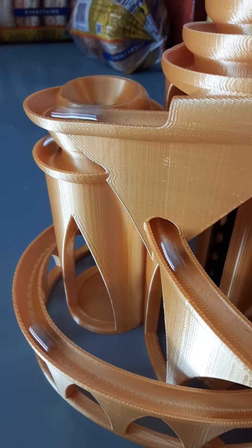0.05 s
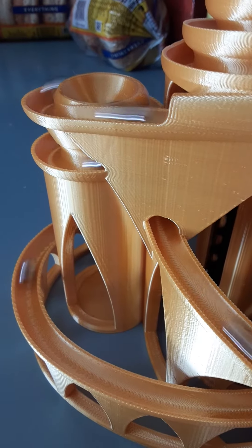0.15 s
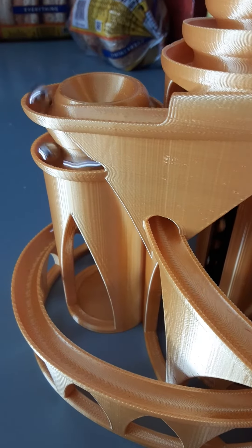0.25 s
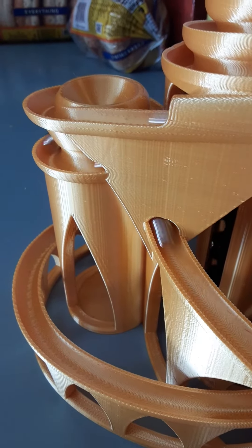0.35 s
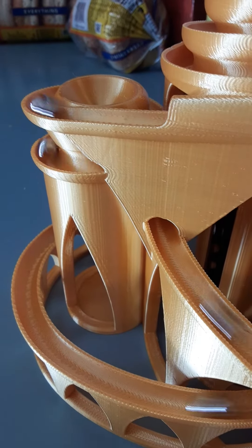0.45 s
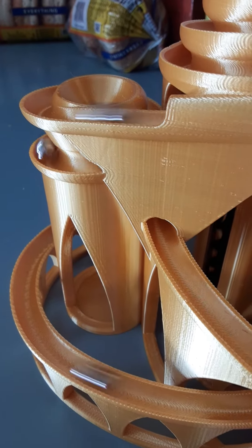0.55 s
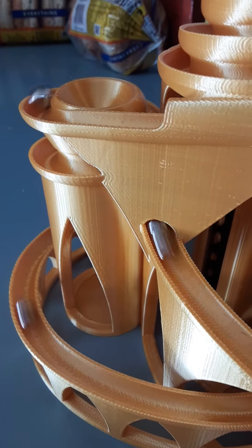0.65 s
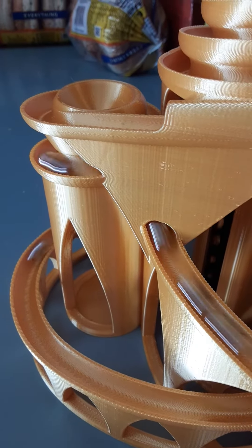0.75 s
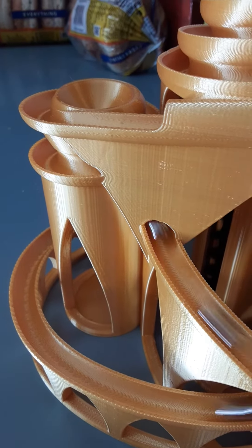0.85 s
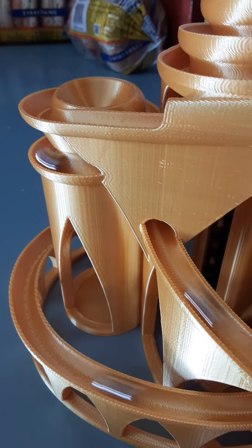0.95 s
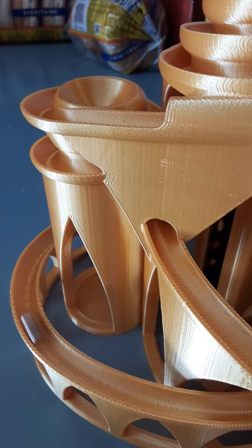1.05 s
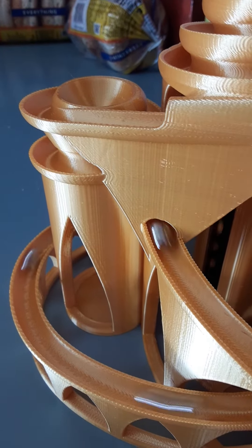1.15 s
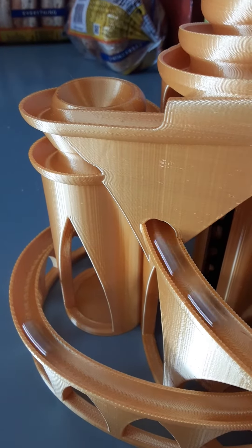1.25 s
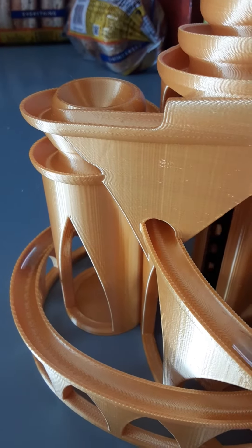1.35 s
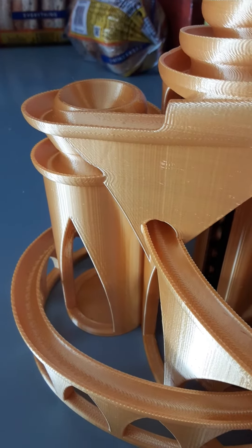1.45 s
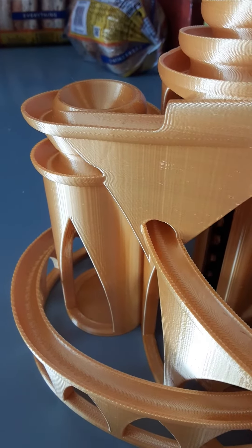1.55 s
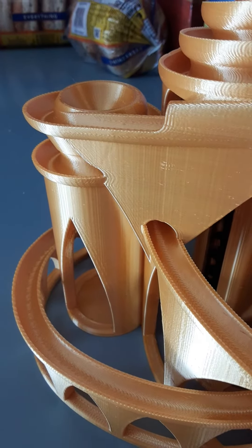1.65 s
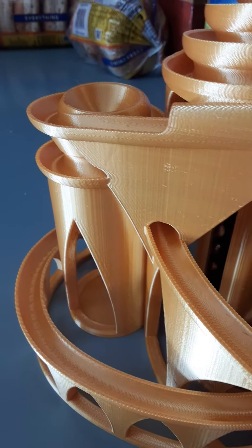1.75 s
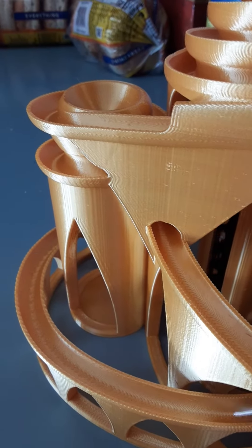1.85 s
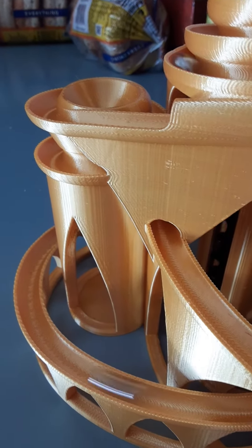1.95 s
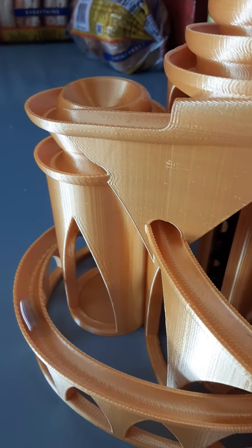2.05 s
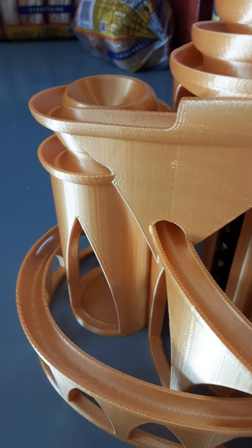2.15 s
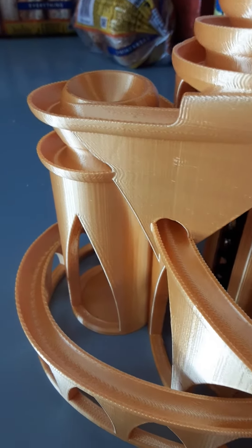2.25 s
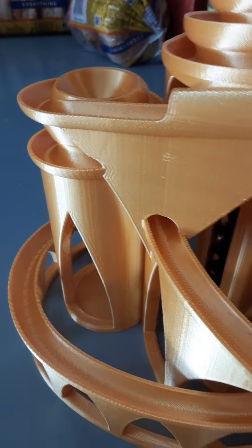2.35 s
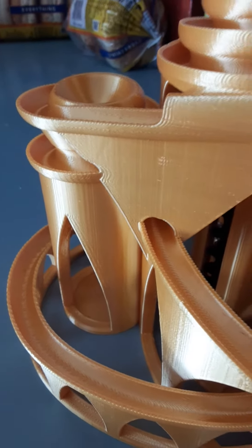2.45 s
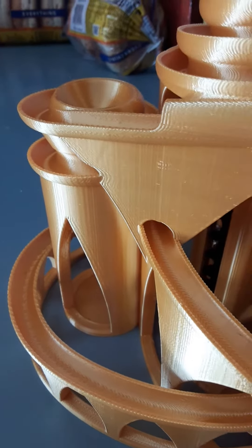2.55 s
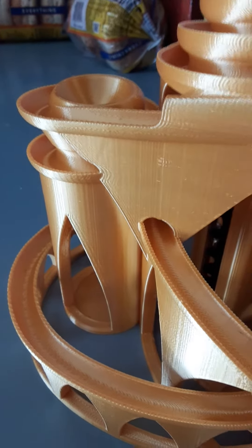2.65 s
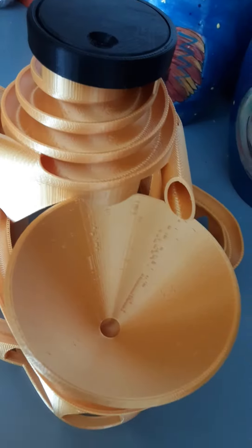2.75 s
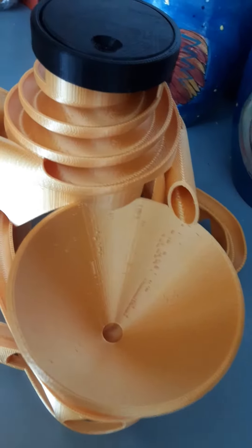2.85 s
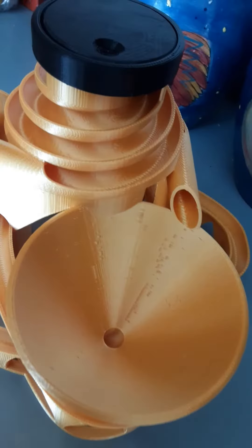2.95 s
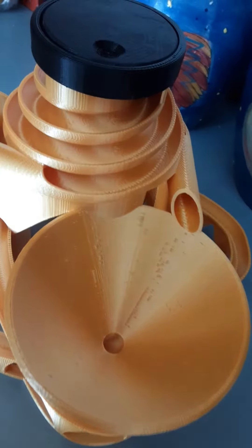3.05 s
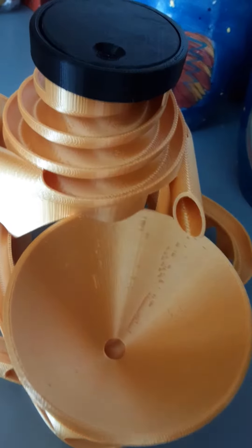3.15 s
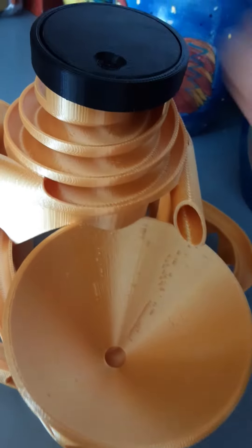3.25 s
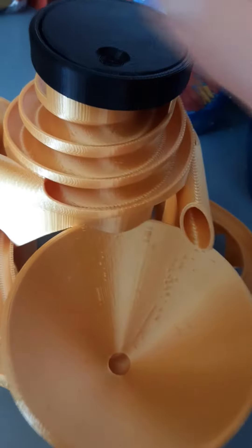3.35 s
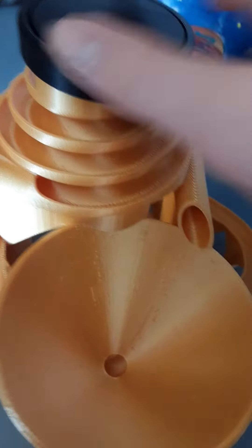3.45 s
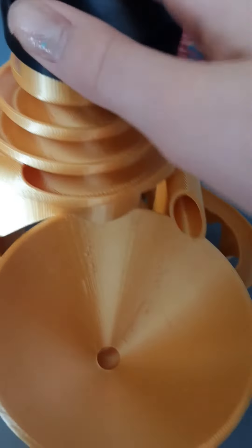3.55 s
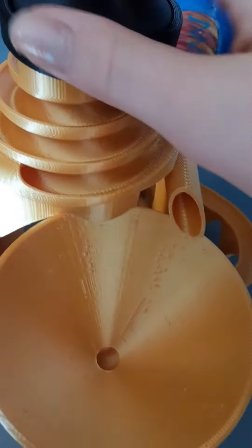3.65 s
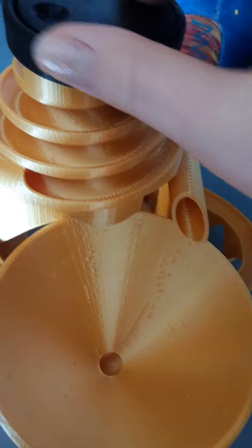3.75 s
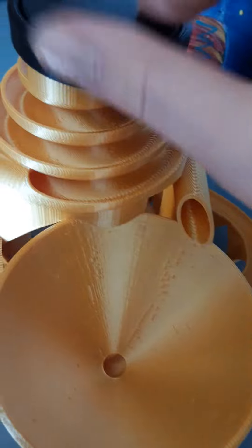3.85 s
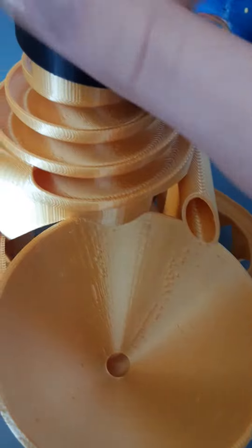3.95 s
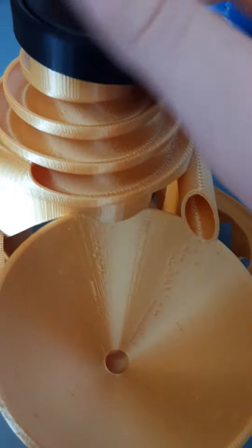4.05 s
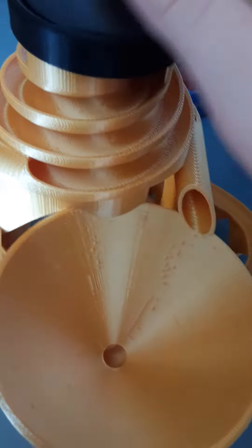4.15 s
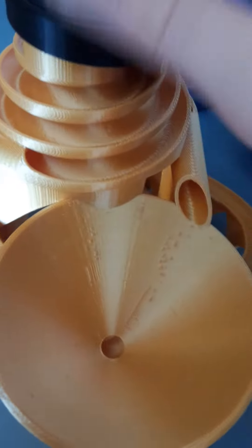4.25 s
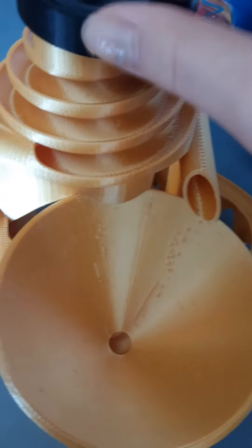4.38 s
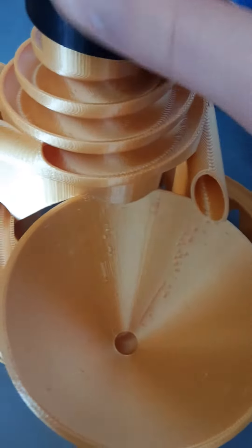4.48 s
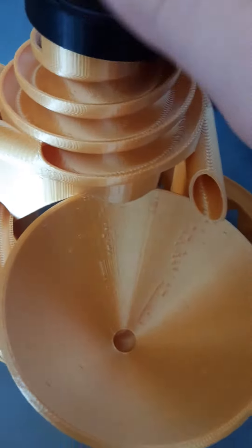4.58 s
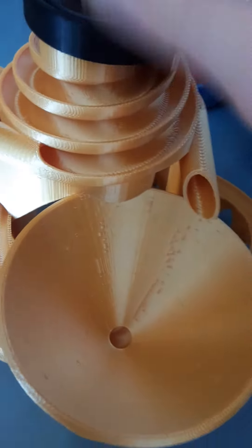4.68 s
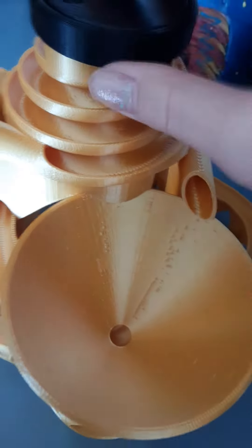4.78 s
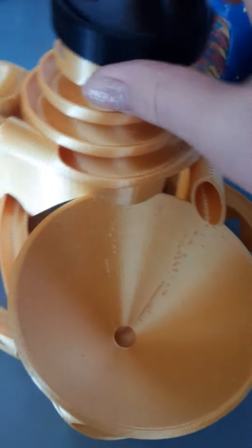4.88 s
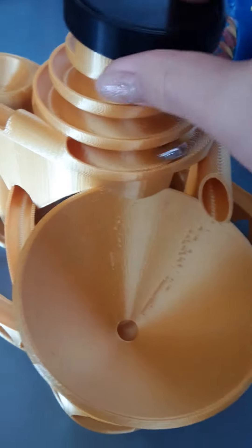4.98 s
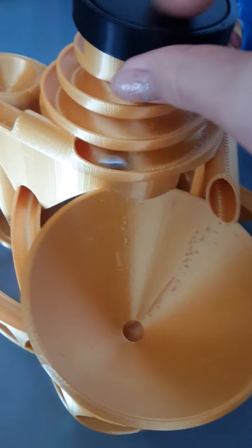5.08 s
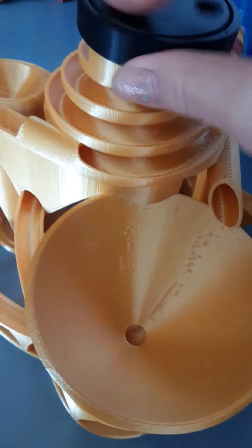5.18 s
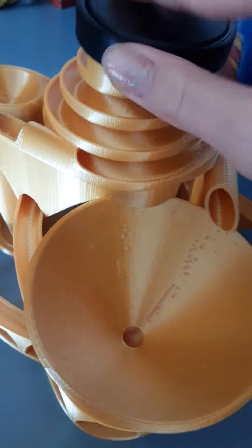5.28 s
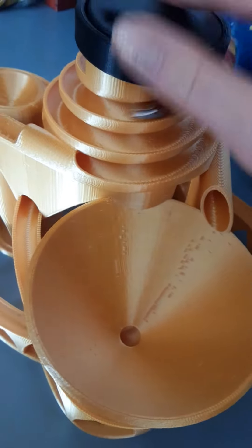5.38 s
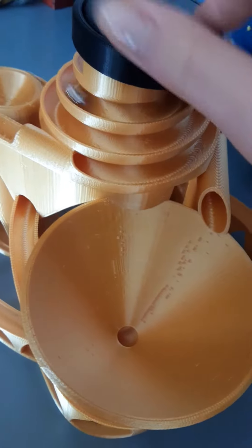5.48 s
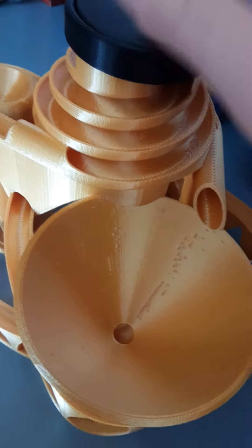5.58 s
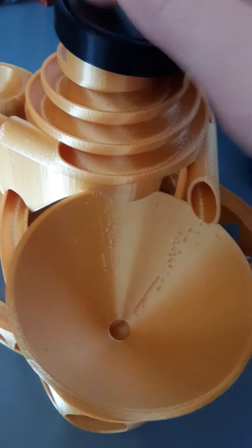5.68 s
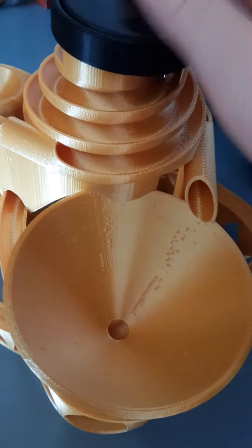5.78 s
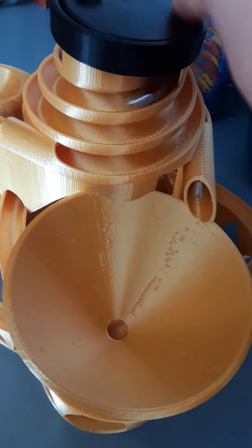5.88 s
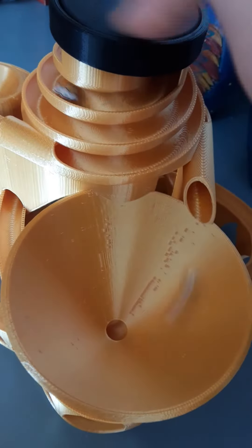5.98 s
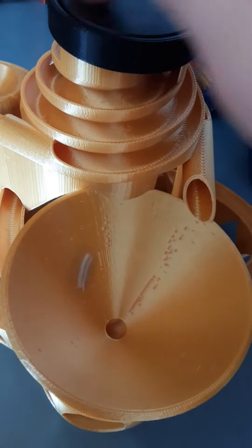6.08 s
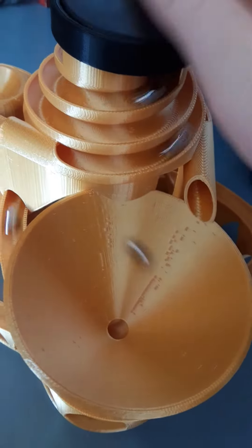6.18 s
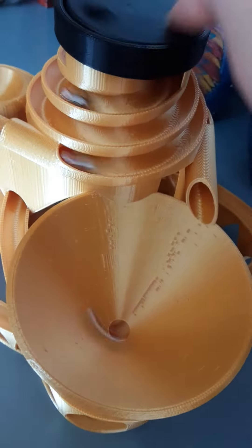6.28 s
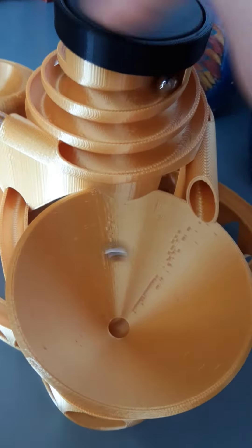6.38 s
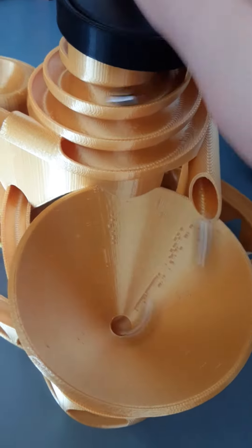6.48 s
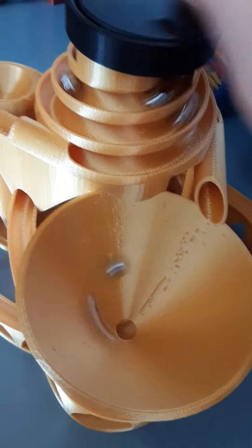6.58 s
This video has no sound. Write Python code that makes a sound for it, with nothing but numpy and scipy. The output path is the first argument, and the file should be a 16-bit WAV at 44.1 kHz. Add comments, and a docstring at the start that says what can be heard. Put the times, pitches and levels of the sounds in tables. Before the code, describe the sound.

Small steel marbles roll and clatter through a hollow plastic marble run, pause in near silence, then crank crunches set them rattling again.

```python
"""Small steel marbles roll and clatter through a hollow printed-plastic marble run on a table, close to a
phone. Ridge bumps and knocks drive the shell's damped modes; bare contact is shaped noise; the table top
thrums. Two scenes follow one another. In the first the run is heard from the side, until the sound stops
abruptly. The scene changes: after a quiet moment with only hum and hiss, a hand turns the crank and marbles
roll, heard from above: the same modes at other levels."""
import sys
import numpy as np
from scipy import signal
from scipy.fft import rfft, irfft, next_fast_len
from scipy.io import wavfile
from scipy.ndimage import uniform_filter1d

SR = 44100
rng = np.random.default_rng(int(sys.argv[2]) if len(sys.argv) > 2 else 0)


def generate_wav(signal):
    """Clip the signal to [-1, 1] and save it as 16-bit WAV at the path in sys.argv[1]."""
    frames = np.transpose(np.atleast_2d(signal))
    scaled = np.clip(frames, -1, 1) * 32767
    pcm = np.round(scaled).astype(np.int16)
    wavfile.write(sys.argv[1], SR, pcm)


def attenuation_scalar(level_db):
    """Turn a level in dB into a linear amplitude multiplier (20 dB per decade)."""
    decades = np.asarray(level_db, float) / 20
    return 10 ** decades


N = 291942
TIME = np.arange(N) / SR
SIDE_END_S, TOP_START_S = 2.733, 3.559


def level(x, rms_db):
    """Scale to an rms level."""
    return x * attenuation_scalar(rms_db) / np.sqrt(np.mean(x ** 2))


def colour(x, points):
    """Shape the spectrum by (Hz, dB) points on a log-frequency axis."""
    hz, db = np.transpose(points)
    size = next_fast_len(len(x))
    log_hz = np.log(np.fft.rfftfreq(size, 1 / SR) + 1)
    gain = attenuation_scalar(np.interp(log_hz, np.log(hz), db))
    return irfft(rfft(x, size) * gain, size)[:len(x)]


def butter(x, order, hz, kind):
    """Butterworth filter."""
    return signal.sosfilt(signal.butter(order, hz, kind, fs=SR, output="sos"), x)


def ring(x, hz, t60_s):
    """One damped mode: a two-pole resonator."""
    radius = np.exp(-np.log(1000) / (t60_s * SR))
    angle = 2 * np.pi * hz / SR
    drive = radius * np.sin(angle) * (1 - radius) ** 0.5
    return signal.lfilter([0, drive], [1, -2 * radius * np.cos(angle), radius ** 2], x)


def fade_out(x, decay_s):
    """Each input value starts an exponential decay."""
    return signal.lfilter([1], [1, -np.exp(-1 / (decay_s * SR))], x)


def walk(rate_hz):
    """Random levels held 1 / rate_hz s and slewed twice; spread near 1."""
    hold = int(SR / rate_hz)
    steps = np.repeat(rng.standard_normal(N // hold + 1), hold)
    return np.sqrt(2) * uniform_filter1d(uniform_filter1d(steps, hold), hold)[:N]


def bumps(rate_hz, scatter_db):
    """Random tiny impacts of either sign; a few are much harder than the rest."""
    when, sign, size = rng.random((3, N))
    hardness = attenuation_scalar(-scatter_db * np.log(size + 0.012))  # the offset limits the hardest
    return (when < rate_hz / SR) * np.sign(sign - 0.5) * hardness


def crackle(rate_hz, scatter_db, smear_s):
    """Envelope of random sharp contacts, each smeared into a short decay of power."""
    return fade_out(bumps(rate_hz, scatter_db) ** 2, smear_s) ** 0.5


def viewpoint(side_db, top_db):
    """Gain from the side, then from above."""
    return attenuation_scalar(np.where(TIME < SIDE_END_S, side_db, top_db))


def ring_time(hz):
    """T60 in seconds: plastic loses the higher modes sooner."""
    t60_1khz_s = 0.038
    return t60_1khz_s * (1000 / hz) ** 0.58


# Modes of the plastic shell. Each row: pitch in Hz, level from the side in dB, level from above in dB.
SHELL_MODES = [(479, -5, -4.5), (641, 2, -37), (773, 1, -33), (846, -17.5, -4), (1068, -6, 1),
               (1217, -0.5, 1.5), (1358, 8, 5.5), (1465, 6.5, 4), (1606, 4, 6), (1763, 4.5, 4),
               (1902, 8, 8), (2065, 9.5, 4), (2310, -6.5, 5), (2462, 6, 4), (2760, 7, -1), (2990, 3.5, -4),
               (3290, -2.5, -14), (3690, -29, -1.5), (4460, -10, -7), (5020, -8.5, -5), (5630, -7, -3),
               (6130, -8.5, -10.5), (7000, -15, -9), (7400, -11, -21.5)]


def shell_rumble(judder):
    """Ridge bumps drive the shell modes; the spots struck change, favouring other modes."""
    ridges = bumps(rate_hz=1500, scatter_db=1.5) * judder
    shell = 0
    for hz, side_db, top_db in SHELL_MODES:
        spot = attenuation_scalar(2.5 * walk(200) + 1.1 * walk(9))
        shell = shell + viewpoint(side_db, top_db) * ring(ridges * spot, hz, ring_time(hz))
    return butter(shell, 4, 427, "high")  # the shell rumble carries nothing below about 430 Hz


PING_HZ = (3700, 4800, 5900, 6800, 10270, 12960)


def pings():
    """Sparse hard ticks on a ridge, each with a brief pitch of its own."""
    rate_hz, t60_s = 43, 0.0041  # rate at each pitch
    total = 0
    for hz in PING_HZ:
        hits = bumps(rate_hz, scatter_db=3.0)
        total = total + level(ring(ring(hits, hz, t60_s), hz, t60_s / 2), 0)
    return total


# Spectrum of bare contact. Each row: frequency in Hz, relative density in dB.
CONTACT_SPECTRUM = [(300, -46.5), (1500, -6.5), (2500, -1), (3400, -4), (4400, -8), (7500, -11),
                    (8400, -21), (12000, -21), (15300, -24.5), (15800, -51)]


def contact_grit(judder):
    """Sharp contacts smear into noisy crackle over a steady hiss; lone pings stand out."""
    contacts = level(crackle(rate_hz=610, scatter_db=3.5, smear_s=0.0011), 0)
    noise = (contacts + attenuation_scalar(-14)) * judder * rng.standard_normal(N)
    grit = level(colour(noise, CONTACT_SPECTRUM), 0)
    return grit + level(colour(pings(), CONTACT_SPECTRUM), -12)


# Modes of the table top. Each row: pitch in Hz, width in Hz, level from the side in dB, from above in dB.
TABLE_MODES = [(140, 150, -6.5, -18), (178.9, 44.5, 4.5, 12), (206, 19, -7, -0.5), (315.5, 8.7, 9, 7.5),
               (402, 27, -13.5, -11.5)]


def table_thrum():
    """Uneven noise pushes on the damped low modes of the table top."""
    push = rng.standard_normal(N) * attenuation_scalar(1.5 * walk(25))
    thrum = 0
    for hz, width_hz, side_db, top_db in TABLE_MODES:
        t60_s = 1.4 / max(width_hz, 22)
        mode = ring(ring(push, hz, t60_s), hz, t60_s) / t60_s ** 0.5
        thrum = thrum + viewpoint(side_db, top_db) * attenuation_scalar(1.5 * walk(6.9)) * mode
    return thrum


# Rolling, side then above. Each row: time in seconds, rumble in dB, grit over rumble in dB.
ROLLING_LEVELS = [(0.0, -25, 6.5), (0.13, -27.5, -3), (0.3, -25, -0.5), (0.5, -26.5, 1.5),
                  (0.75, -25, -1.5), (1.04, -25, -2), (1.29, -26.5, -4.5), (1.35, -23.5, -1),
                  (1.42, -26, -7.5), (1.5, -24.5, -9.5), (1.78, -23.5, 0), (2.06, -32, -5.5),
                  (2.18, -27.5, -2.5), (2.3, -31.5, -6.5), (2.38, -26, -10.5), (2.47, -34.5, -4),
                  (2.72, -34, -12), (3.578, -39.5, -11.5), (3.63, -60, -22), (3.69, -59, -30),
                  (4.3, -36, -17), (4.6, -45, -6), (4.76, -46.5, -0.5), (4.94, -39, -8), (4.961, -24.5, -5),
                  (5.04, -27.5, -6.5), (5.09, -22, -7.5), (5.17, -28, -5.5), (5.38, -29.5, -6),
                  (5.46, -26.5, -2), (5.58, -31, -3), (5.72, -31, -3), (5.78, -27, -1.5), (5.9, -26, -7.5),
                  (6.0, -27, -4.5), (6.2, -26, -5), (6.45, -25.5, -4), (6.61, -23, 0)]
# Pushes on the crank. Each row: start in seconds, end in seconds, rumble in dB.
CRANK_PUSHES = [(3.74, 3.935, -36), (3.968, 4.028, -25), (4.145, 4.253, -27.5), (4.379, 4.517, -29.5)]
# Table thrum of the rolling. Each row: time in seconds, level over rumble in dB.
THRUM_LEVELS = [(0, -11.5), (1.9, -11.5), (2.3, -13.5), (2.34, -3), (2.43, -16), (2.7, -14), (3.62, -11.5),
                (3.74, -12), (4.55, -14.5), (4.9, -8.5), (5.1, -16.5), (5.3, -19.5), (5.5, -15), (6.1, -16),
                (6.6, -21)]


def motion():
    """Gains of rumble, grit and thrum: rolling, crank pushes and the stir after knocks add as power."""
    s, rumble_db, grit_db = np.transpose(ROLLING_LEVELS)
    roll = attenuation_scalar(np.interp(TIME, s, rumble_db))
    roll_grit = roll * attenuation_scalar(np.interp(TIME, s, grit_db))
    roll_thrum = roll * attenuation_scalar(np.interp(TIME, *np.transpose(THRUM_LEVELS)))

    rise_db_per_s, fall_db_per_s = 308, 330
    push = 0
    for start_s, end_s, db in CRANK_PUSHES:
        rise_db = rise_db_per_s * np.maximum(start_s - TIME, 0)
        fall_db = fall_db_per_s * np.maximum(TIME - end_s, 0)
        push = push + attenuation_scalar(db - rise_db - fall_db)

    # a knock shakes up loose marbles and the table for a moment
    hits = np.zeros(N)
    for row in KNOCKS + TUMBLES:
        hits[int(row[0] * SR)] = attenuation_scalar(row[1])
    stir = fade_out(hits, 0.037)

    rumble = np.hypot(roll, push)
    grit = np.hypot(np.hypot(roll_grit, push * attenuation_scalar(-9.5)), stir * attenuation_scalar(-23))
    thrum = np.hypot(np.hypot(roll_thrum, push * attenuation_scalar(-16)), stir * attenuation_scalar(-35.5))
    # no rolling in the quiet moment
    stopping = np.clip((SIDE_END_S - TIME) / 0.0012, 0, 1)
    restarting = np.clip((TIME - TOP_START_S) / 0.017, 0, 1)
    moving = stopping + restarting
    return rumble * moving, grit * moving, thrum * moving


def rolling():
    """Marbles rolling over print ridges: shell rumble, contact grit and table thrum follow the motion."""
    judder = attenuation_scalar(0.8 * walk(35))
    layers = shell_rumble(judder), contact_grit(judder), table_thrum()
    return sum(level(x, 0) * gain for x, gain in zip(layers, motion()))


def clatter(rows, rattle_0db_s, shorter_per_db):
    """A short rattle of contacts drives the shell modes, most near the spot's pitch, plus a crack and steel."""
    out, t = np.zeros(N + SR), np.arange(SR // 10) / SR
    hz, side_db, top_db = np.transpose(SHELL_MODES)
    decays = np.exp(-np.log(1000) * t / ring_time(hz)[:, None]) * np.sin(2 * np.pi * hz[:, None] * t)
    chance = rng.standard_normal((len(rows), 3, len(t)))
    for (s, clack_db, spot_hz, ring_db, tick_db), (contact_noise, crack_noise, vary) in zip(rows, chance):
        rattle_s = rattle_0db_s * attenuation_scalar(shorter_per_db * clack_db)
        contact = contact_noise * np.minimum(t / (0.68 * rattle_s), 1) * np.exp(-t / rattle_s)
        contact = butter(contact, 2, 738, "high")  # a short blow hardly moves the lowest modes

        near_db = 12.0 * np.exp(-(np.log(hz / spot_hz) / 0.11) ** 2) + 2.5 * vary[:len(hz)]
        mode_db = (side_db if s < SIDE_END_S else top_db) + near_db
        modes = attenuation_scalar(mode_db)[:, None] * decays
        split_hz = spot_hz / 1.3  # modes below are the shell ring
        low = signal.fftconvolve(contact, modes[hz < split_hz].sum(axis=0))[:len(t)]
        upper = signal.fftconvolve(contact, modes[hz > split_hz].sum(axis=0))[:len(t)]

        # the crack starts fast, then a tail nearly as strong swells and dies more slowly
        burst = np.minimum(t / max(0.0007, rattle_s / 2), 1) * np.exp(-t / (2 * rattle_s))
        tail = attenuation_scalar(-0.5) * np.minimum(t / 0.0073, 1) * np.exp(-t / min(9 * rattle_s, 0.014))
        spot = [(spot_hz / 1.1, 0), (spot_hz, 9.0), (spot_hz * 1.6, 0)]
        crack = colour(colour(crack_noise * (burst + tail), CONTACT_SPECTRUM), spot)
        tick = butter(crack, 4, 8300, "high")
        # steel on steel sings on a while near 12 kHz
        steel_hz = 11600 + 900 * np.tanh(vary[-1])
        steel = ring(crack_noise * (burst + 0.45 * tail), steel_hz, 0.0058)

        layers = [(upper, -2.5),
                  (crack - tick, -0.5 + 0.37 * clack_db),  # softer knocks ring more than they crack
                  (low, ring_db + 2.5),
                  (tick * np.exp(-t / 0.0072), tick_db + 9.0),
                  (steel, tick_db)]
        start = int(s * SR)
        out[start:start + len(t)] += sum(x * attenuation_scalar(clack_db + db) / np.abs(x).max() for x, db in layers)
    return out[:N] * ((TIME < SIDE_END_S) | (TIME > TOP_START_S))


# Knocks. Each row: start in seconds, strength in dB, struck spot's loudest pitch in Hz,
# shell ring trim in dB, steel tick trim in dB.
KNOCKS = [(0.011, -6.5, 3070, -10, -26.5), (0.0382, -10.5, 3130, -16, -13),
          (0.0862, -9.5, 3160, -5.5, -31.5), (0.116, -12.5, 3260, -16.5, -9),
          (0.1273, -11.5, 4150, -5.5, -12), (0.1679, -11, 5650, 3.5, -9.5), (0.189, -8.5, 3070, -29.5, -35),
          (0.218, -17.5, 3160, -18, -4), (0.232, -13.5, 3100, -3, -7), (0.246, -12.5, 3100, -5, -8),
          (0.4576, -15, 3130, 1, -10), (0.572, -14, 4670, -14, -13), (0.6496, -8.5, 3600, -6.5, -9),
          (0.697, -11.5, 3130, -19, -14), (0.782, -11.5, 3200, -3, -20), (0.8644, -13, 3505, -4, -17),
          (0.9358, -13.5, 3375, -20.5, -9), (0.998, -10.5, 3443, -18, -19), (1.039, -5.5, 5030, -6, -13.5),
          (1.1264, -12, 3180, -15, -18), (1.1615, -13, 7400, 1, -20), (1.2392, -12.5, 3290, -4, -18),
          (1.3241, -13, 2680, -3, -13), (1.3274, -6.5, 3114, -4.5, -18), (1.3445, -8, 3580, -4, -25),
          (1.3594, -7.5, 3500, -12.5, -25.5), (1.428, -16.5, 5600, -13, -22), (1.4654, -8, 6300, -2.5, -20),
          (1.486, -8.5, 3380, -9, -23), (1.4929, -11.5, 5270, -4.5, -20), (1.6509, -6, 4460, -16.5, -12),
          (1.703, -14.5, 6200, -4.5, -6), (1.7455, -6.5, 6500, -3, -7.5), (1.779, -12, 3490, 2, -23),
          (1.836, -7, 3360, -14, -21), (1.8446, -7, 4800, -15.5, -6), (1.88, -12.5, 4590, 2, -35),
          (1.904, -10, 3500, -18.5, -9.5), (1.9995, -21, 3350, -7, -4.5), (2.09, -20.5, 6400, -5, -8.5),
          (2.1186, -17.5, 2970, 3, -10), (2.1488, -10.5, 3200, -18.5, -9), (2.202, -18, 2800, 0, -18),
          (2.23, -13, 3240, -0.5, -11), (2.303, -10.5, 5900, -11, -6), (2.3269, -5.5, 3180, -3, -10),
          (2.3739, -10.5, 4700, -3, -12.5), (2.4916, -26.5, 2928, 9, -17), (2.5154, -23.5, 3010, 4, -18),
          (2.566, -21, 2990, -17, -26), (2.6133, -21.5, 2940, 4, -17), (2.625, -21, 2750, 1, -23),
          (2.694, -21, 2800, 1.5, -22), (2.7076, -23.5, 2690, -5, -10), (2.725, -26, 2760, 6.5, -17),
          (3.5735, -35, 3850, 1.5, -14), (3.7054, -43, 3730, 10.5, -4), (4.4741, -6.5, 4140, -3.5, -17.5),
          (5.433, -17.5, 7000, -10, -27), (5.481, -15, 3400, -8, -21), (5.5132, -14.5, 4840, -12, -16),
          (5.523, -20, 7000, -12, -10), (5.545, -17.5, 5600, -10, -24), (5.57, -22, 5630, -20, -24),
          (5.5847, -14.5, 5330, -20, -31), (5.613, -15.5, 6100, -18, -26), (5.646, -18, 4900, -3, -27),
          (5.753, -19, 3700, -9, -26), (6.036, -8, 6240, -0.5, -47.5), (6.048, -14, 6500, -12, -15),
          (6.063, -14, 6500, -10, -16), (6.103, -13.5, 6000, -5, -13), (6.14, -13, 6000, -10, -17),
          (6.2955, -9.5, 7000, -7, -17), (6.3077, -11.5, 6950, -23, -19), (6.317, -10.5, 6900, -12, -17),
          (6.378, -12, 6900, -10, -12), (6.3928, -15, 5600, 0, -13), (6.4135, -12.5, 6100, -2, -11.5),
          (6.528, -13, 6900, -10, -15), (6.539, -10, 6740, -16, -16.5), (6.569, -6.5, 6300, -3, -43.5),
          (6.5875, -12, 4000, -12, -24), (6.6114, -14.5, 3150, -2.5, -20)]


def knocks():
    """Marbles knock on walls and on each other; softer knocks rattle more briefly."""
    return clatter(KNOCKS, rattle_0db_s=0.0027, shorter_per_db=0.95)


# Several marbles at once. Each row: start in seconds, strength in dB, struck spot's loudest pitch in Hz,
# shell ring trim in dB, steel tick trim in dB.
TUMBLES = [(3.9628, -13, 3340, -2, -12), (3.991, -8, 4000, -2.5, -8), (4.2094, -6.5, 3970, -1.5, -11),
           (5.07, -12.5, 3630, -4.5, -26)]


def tumbles():
    """Several marbles tumble at once in a longer crunch."""
    return clatter(TUMBLES, rattle_0db_s=0.0069, shorter_per_db=0)


def struck(hits, modes, contact_s, grind=0, stray=0):
    """Brief blows, optionally with a short grind, on one part; each varies the mode levels, stray the pitches."""
    out, t = np.zeros(N + SR), np.arange(SR // 10) / SR
    chance = rng.standard_normal((len(hits), len(t)))
    for (s, peak_db), vary in zip(hits, chance):
        pulse = (1 + 0.5 * vary) * np.exp(-t / contact_s) * np.cos(2 * np.pi * modes[-1][0] * t)
        blow = pulse + grind * vary * np.exp(-t / 0.0027)
        blow = blow - blow.mean()
        x = 0
        for k, (hz, db, t60_s) in enumerate(modes):
            bent_hz = hz * (1 + stray * vary[-9 - k])
            x = x + attenuation_scalar(db + 2 * vary[-1 - k]) * ring(blow, bent_hz, t60_s) * t60_s ** 0.5
        start = int(s * SR)
        out[start:start + len(t)] += x * attenuation_scalar(peak_db) / np.abs(x).max()
    return out[:N]


# Bounces in the cup. Each row: start in seconds, peak in dB.
CUP_BOUNCES = [(1.6491, 0), (1.6725, -17.5), (1.7035, -17), (1.7455, -15)]
# Modes of the cup. Each row: pitch in Hz, level in dB, T60 in seconds.
CUP_MODES = [(3340, 3.5, 0.024), (4520, -3, 0.025), (5900, -3.5, .025), (7730, -8, 0.041)]


def cup_drop():
    """A marble drops into a stiff cup and bounces."""
    return struck(CUP_BOUNCES, CUP_MODES, contact_s=0.00004)


# Bounces in the tower. Each row: start in seconds, peak in dB.
TOWER_BOUNCES = [(2.3026, -6), (2.3268, -12), (2.352, -24), (2.3742, -16), (2.394, -21), (2.41, -20)]
# Modes of the tower. Each row: pitch in Hz, level in dB, T60 in seconds.
TOWER_MODES = [(300, -11, 0.06), (1510, 0, 0.099), (2065, 4.5, 0.046), (3220, -5, .04)]


def tower_landing():
    """A marble lands in a hollow tower and bounces."""
    return struck(TOWER_BOUNCES, TOWER_MODES, contact_s=0.00008)


# Taps along the chute. Each row: start in seconds, peak in dB.
CHUTE_TAPS = [(4.6838, -25.5), (4.6965, -22.5), (4.7075, -34), (4.7175, -30), (4.7265, -31), (4.737, -31),
              (4.763, -33), (4.7735, -29), (4.79, -27), (4.805, -33), (4.8144, -19), (4.8285, -25),
              (4.8415, -23), (4.8585, -18.5), (4.8742, -21), (4.8814, -33), (4.897, -29), (4.9066, -22),
              (4.918, -28), (4.925, -27), (4.932, -28)]
# Modes of the chute. Each row: pitch in Hz, level in dB, T60 in seconds.
CHUTE_MODES = [(1220, -3.5, .018), (1890, -1, 0.017), (2490, -2, 0.011), (2800, -12, 0.1)]


def chute_taps():
    """One marble taps and grinds its way along a hollow chute."""
    return struck(CHUTE_TAPS, CHUTE_MODES, contact_s=0.00008, grind=0.1, stray=0.012)


# Clicks of the lift. Each row: start in seconds, peak in dB.
LIFT_CLICKS = [(4.668, -38), (4.684, -31), (4.696, -23), (4.7068, -23), (4.747, -32), (4.7535, -31),
               (4.7815, -30), (4.8043, -21.5), (4.8285, -19.5), (4.8475, -24), (4.874, -29), (4.8814, -28)]
# Modes of the lift. Each row: pitch in Hz, level in dB, T60 in seconds.
LIFT_MODES = [(4400, -3.5, 0.0055), (6000, 2.5, 0.0065), (7100, -7, 0.005)]


def lift_clicks():
    """Thin bright clicks in the lift as the crank creeps."""
    return struck(LIFT_CLICKS, LIFT_MODES, contact_s=0.00004, grind=0.4, stray=0.041)


# Marbles jostling in a queue. Each row: start in seconds, decay constant in seconds, level in dB.
QUEUE_JOSTLES = [(0.215, 0.04, -27), (0.598, 0.018, -29), (2.15, 0.024, -21), (2.243, 0.017, -26.5),
                 (3.73, 0.049, -50), (3.85, .06, -53), (4.255, 0.015, -36), (5.99, .03, -40),
                 (6.095, .03, -41), (6.36, 0.024, -40)]


def jostling():
    """Quick thin clicks of steel on steel that fade as the queue settles."""
    clicks = crackle(rate_hz=1700, scatter_db=3.5, smear_s=0.0012) * rng.standard_normal(N)
    thin = level(butter(clicks, 2, (9500, 14500), "band"), 0)
    gain = 0
    for start_s, decay_s, db in QUEUE_JOSTLES:
        since_s = np.maximum(TIME - start_s, 0)
        gain = gain + attenuation_scalar(db) * (TIME > start_s) * np.exp(-since_s / decay_s)
    return thin * gain


# Spectrum of room and microphone. Each row: frequency in Hz, relative density in dB.
QUIET_SPECTRUM = [(15, -41), (25, -8), (82, 1), (293, -12.5), (416, -19), (3430, -34), (5880, -34),
                  (7510, -23), (9570, -37.5), (10400, -26.5), (16000, -27)]
# The low hum swells once. Each row: time in seconds, gain in dB.
HUM_SWELL = [(2.76, -3), (3.25, -8.5), (3.38, 10), (3.45, -3)]


def quiet():
    """Faint room hum and microphone hiss: shaped noise whose lows follow the swell."""
    noise = level(colour(rng.standard_normal(N), QUIET_SPECTRUM), -71.5)
    hum = butter(noise, 2, 300, "low")
    return noise - hum + hum * attenuation_scalar(np.interp(TIME, *np.transpose(HUM_SWELL)))


def microphone(run):
    """The phone hears little of the run's deep bass and nearly nothing above its top limit."""
    low_hz, top_hz = 105, 15800
    run = butter(run, 2, low_hz, "high")
    return signal.sosfilt(signal.ellip(8, 0.3, 50, top_hz, fs=SR, output="sos"), run)


def scene():
    """The marble run through the microphone, over the quiet room."""
    run = rolling() + knocks() + tumbles()
    run = run + cup_drop() + tower_landing() + chute_taps() + lift_clicks() + jostling()
    return (microphone(run) + quiet())[None]


def top_cut(x):
    """Nothing passes above the cut-off."""
    return signal.sosfilt(signal.butter(12, 16640, fs=SR, output="sos"), x)


def record(dry):
    """Peaks beyond full scale are clipped."""
    mix = np.clip(dry, -1, 1)
    return top_cut(mix)


dry = scene()
out = record(dry)
generate_wav(out)
```